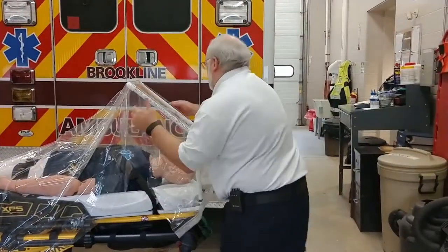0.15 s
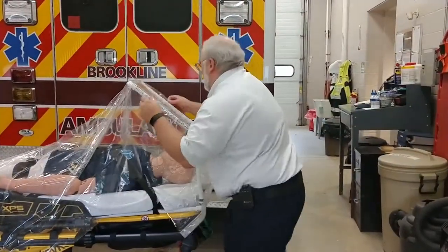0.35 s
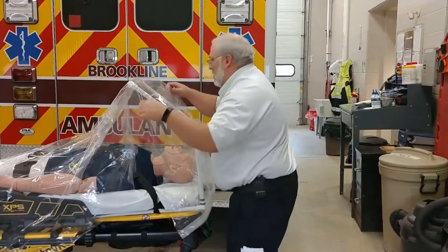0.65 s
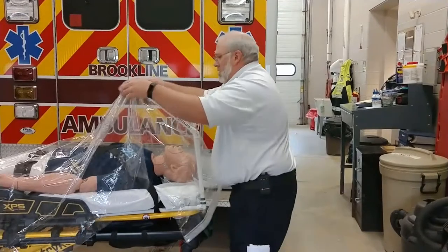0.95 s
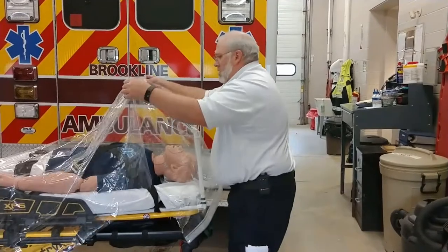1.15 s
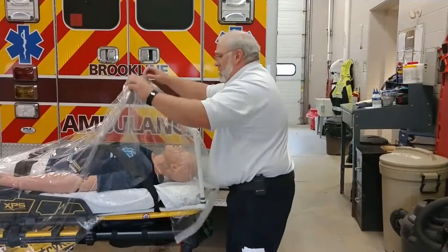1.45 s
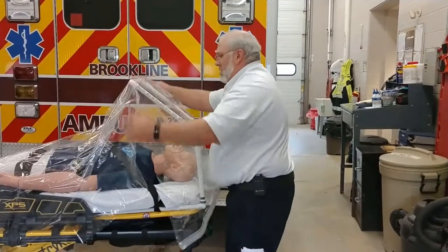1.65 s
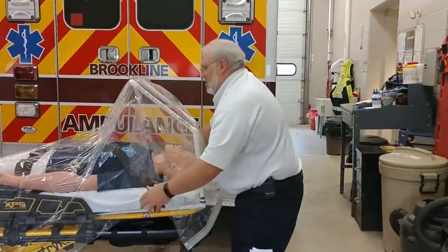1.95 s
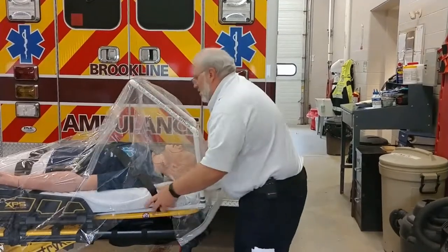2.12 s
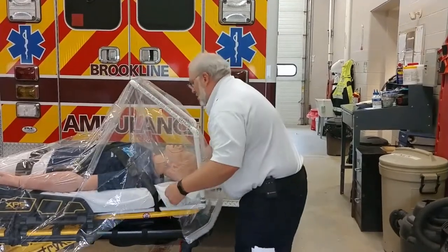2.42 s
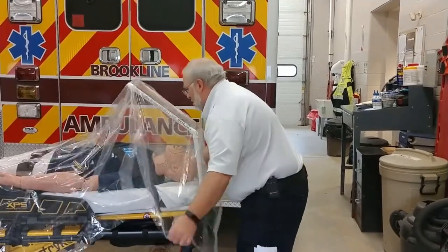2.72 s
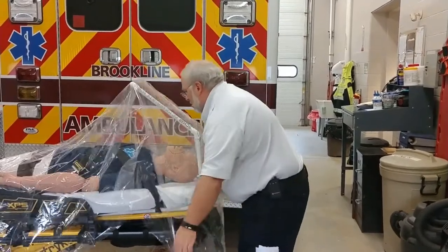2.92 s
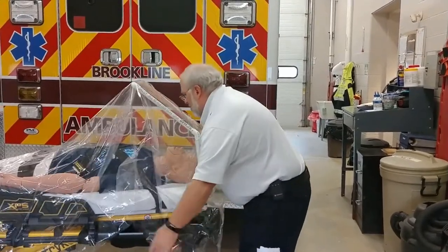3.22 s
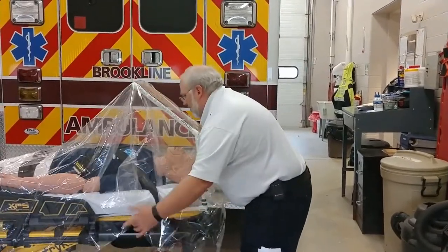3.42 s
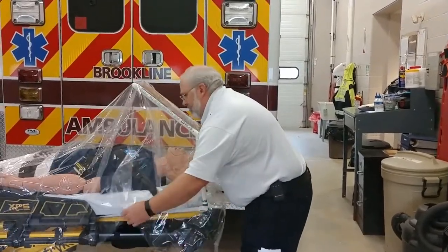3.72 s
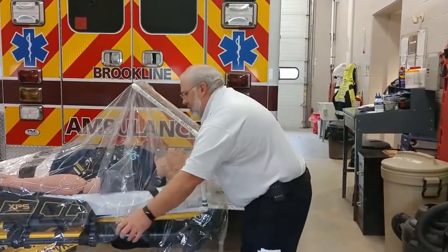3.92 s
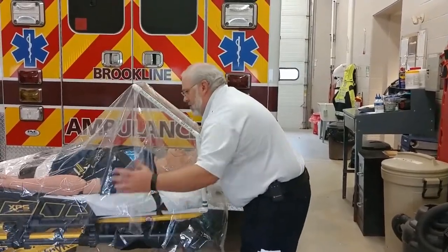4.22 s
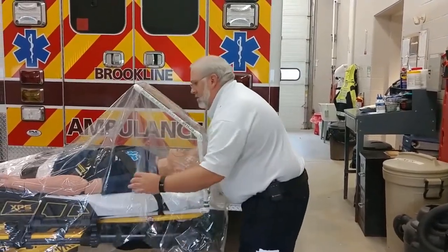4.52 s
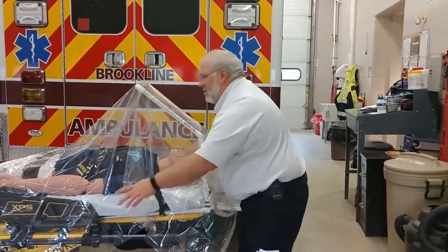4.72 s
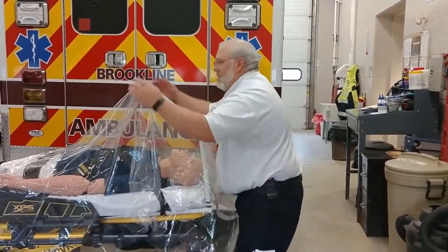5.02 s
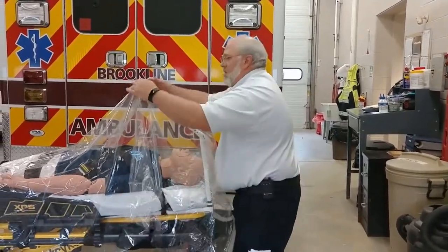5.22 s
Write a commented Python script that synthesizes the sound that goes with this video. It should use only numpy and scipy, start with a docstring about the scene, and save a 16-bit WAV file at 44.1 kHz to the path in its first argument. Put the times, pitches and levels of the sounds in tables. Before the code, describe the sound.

Plastic film crinkles in irregular bursts, bright fine creases over duller folds. A strong early snap leads to a rustling pull, then weaker movements; the loudest jerk comes about halfway, with booming panels and a slap. Later handling brings many quick cracks, then near quiet and a last faint crinkle. Heard from a few metres in a reverberant garage, through a camera microphone with reduced room noise and a faint hum.

```python
"""A bright, dry plastic crackle comes in uneven pulls, with sharp single cracks and dull thuds among it.
A stiff clear sheet is pulled over a frame in a large hard-walled garage, a few metres from a camera.
Rustle, panels and billows are crowds of random noise bursts; cracks are single bursts, the slap a short swing.
Decaying noise makes the walls' answer, and a faint hum stays in the room.
One microphone rings in its housing, and the camera turns down the room noise."""
import sys
import numpy as np
from scipy import signal
from scipy.fft import rfft, irfft, next_fast_len
from scipy.io import wavfile
from scipy.ndimage import uniform_filter1d

SR = 44100
rng = np.random.default_rng(int(sys.argv[2]) if len(sys.argv) > 2 else 0)


def transcribe(signal):
    """Save signal, clipped to [-1, 1], as a 16-bit WAV file at the path in sys.argv[1]."""
    frames = np.atleast_2d(signal).T
    limited = np.clip(frames, -1, 1)
    pcm = np.round(limited * 32767).astype(np.int16)
    wavfile.write(sys.argv[1], SR, pcm)


N = 236014  # length in samples

# uneven pulls of the sheet, each swelling and fading in its own way:
# t/s, level of wide folds/dB, level of fine creases/dB
PULLS = [
    [(0, -53.5, -52), (.13, -56.5, -54), (.42, -57.5, -52.5), (.448, -58, -43), (.496, -55, -60)],
    [(.499, -46.5, -39.5), (.535, -42.5, -41), (.555, -44.5, -43.5), (.869, -49.5, -46),
     (1.027, -62, -72.5), (1.055, -59.5, -69), (1.096, -62, -56)],
    [(1.099, -56, -49.5), (1.123, -55.5, -48.5), (1.245, -55.5, -47), (1.265, -59, -54),
     (1.354, -54.5, -46.5)],
    [(1.357, -52, -43.5), (1.377, -50.5, -41.5), (1.627, -49.5, -46), (1.783, -58, -59.5),
     (1.835, -63, -71), (1.85, -59, -55.5), (1.875, -61.5, -63)],
    [(1.878, -55.5, -46), (1.934, -65, -71), (1.95, -60.5, -54.5), (2.002, -66.5, -59.5)],
    [(2.005, -58, -47.5), (2.079, -47, -40), (2.225, -53, -47.5), (2.429, -60.5, -60.5),
     (2.473, -67, -62.5), (2.548, -59.5, -61)],
    [(2.551, -53, -50.5), (2.597, -55.5, -52), (2.735, -43, -35), (2.745, -35.5, -31), (2.791, -44.5, -36),
     (2.829, -40, -34), (3.073, -49, -44.5)],
    [(3.097, -44.5, -40), (3.141, -45.5, -39.5), (3.173, -53.5, -46.5), (3.366, -55, -62)],
    [(3.369, -56, -60), (3.397, -54.5, -50), (3.447, -58.5, -50), (3.487, -55, -49.5), (3.855, -51, -45)],
    [(3.867, -48, -38), (3.921, -49.5, -43), (3.971, -45.5, -38.5), (4.093, -55, -51.5), (4.101, -52, -47),
     (4.241, -57.5, -62), (4.283, -62, -71), (4.339, -57.5, -59)],
    [(4.342, -59.5, -52), (4.406, -55, -52.5), (4.502, -50.5, -46.5), (4.584, -54.5, -45.5),
     (4.726, -54, -44), (4.79, -57.5, -47), (4.902, -56, -56), (5.01, -70, -87), (5.262, -76.5, -99)],
    [(5.265, -79, -62), (5.281, -80, -54), (5.337, -67, -61), (5.35, -76, -74)],
]
# tone of the wide folds: f/Hz, relative level/dB
WIDE_TONE = [(900, -31), (1500, -5.5), (2100, -2), (2500, -1.5), (2900, -1), (3300, -0.5), (3700, -3.5),
             (4800, -35.5)]
# tone of the tight folds: f/Hz, relative level/dB
TIGHT_TONE = [(2800, -35.5), (3700, -2), (4400, -2.5), (5400, -1), (6200, -2), (8000, -39)]
# tone of the fine creases, also of a crack's edge: f/Hz, relative level/dB
FINE_TONE = [(4800, -42), (6300, -3), (8000, 1), (10500, 0.5), (11500, -3), (13000, -6), (15300, -12),
             (17000, -8)]


def rustle():
    """Small creases snap brightly and briefly; wide folds are duller and longer."""
    wide_db, fine_db = levels(np.concatenate(PULLS))
    # tight folds lie between the other two, 58 % of the way to the fine ones, then 2.5 dB lower
    tight_db = wide_db + 0.58 * (fine_db - wide_db) - 2.5
    wide = creases(WIDE_TONE, per_s=870, spread_db=2.5, life=0.0033, smooth=1.0, patchy_db=1.77)
    tight = creases(TIGHT_TONE, per_s=610, spread_db=3.5, life=0.0034, smooth=1.0, patchy_db=1.0)
    fine = creases(FINE_TONE, per_s=1200, spread_db=2.5, life=0.00083, smooth=1.0, patchy_db=1.74)
    return amp(wide_db) * wide + amp(tight_db) * tight + amp(fine_db) * fine


# single cracks: t/s, level of bright edge/dB, level of dull body/dB, centre f of the edge/Hz
BIG_CRACKS = [(.0326, -37, -48, 10600), (.1437, -39, -35.5, 7900), (.1704, -30, -33.5, 9400),
              (.3619, -35, -39, 9400), (.4264, -34, -53.5, 10900), (.444, -34, -32.5, 11000),
              (.4596, -27, -33, 10900), (.5287, -16, -28.5, 7240), (.5355, -36, -21.5, 8140),
              (.8203, -30, -29, 9800), (1.1001, -44, -39, 9500), (1.3048, -35, -38, 10900),
              (1.38, -26, -28, 11000), (1.4892, -34, -28, 10500), (1.8802, -36.5, -38, 9500),
              (2.0049, -34, -28.5, 9500), (2.5518, -42, -33.5, 9300), (2.6562, -26, -29, 9400),
              (2.716, -54, -23.5, 8850), (2.7473, -28, -13.5, 10400), (2.826, -21, -30, 10660),
              (2.9929, -24.5, -28.5, 10700), (3.3013, -35, -42, 10300), (3.3702, -36, -47, 9400),
              (3.478, -34.5, -33.5, 9100), (3.5611, -27, -44.5, 10300), (3.6019, -30, -34, 10200),
              (3.7572, -29, -43, 10800), (3.817, -32, -33, 10400), (3.8703, -22.5, -25.5, 10300),
              (3.9634, -39, -31, 9000), (4.1032, -26.5, -33.5, 9700), (4.3428, -33.5, -32.5, 9200),
              (4.3702, -36, -33.5, 10600), (4.4387, -35, -40, 10300), (4.4904, -24, -32, 10000),
              (4.4967, -28, -34, 9600), (4.513, -35, -30.5, 10100), (4.541, -32.5, -40, 10600),
              (4.591, -22, -28, 10800), (4.605, -31, -37, 9900), (4.631, -24, -34, 10600),
              (4.6522, -28, -25.5, 10000), (4.6581, -35, -33, 10000), (4.6817, -41, -33, 9300),
              (4.6904, -17, -33, 10800), (4.7442, -28.5, -37, 10400), (4.7498, -24.5, -26.5, 9550),
              (4.7612, -22.5, -33.5, 10500), (5.021, -50, -39.5, 7600), (5.2656, -29, -41, 11500),
              (5.2828, -40.5, -41.5, 10200), (5.3016, -47, -49.5, 9400), (5.3145, -49, -44, 9300)]
# tone of a crack's dull body: f/Hz, relative level/dB
BODY_TONE = [(300, -68.5), (600, -22.5), (1000, -4), (2000, -6.5), (3500, -1), (5500, 2), (8000, -13.5)]


def cracks():
    """Each big buckle is a sharp bright edge over a dull body; the tighter the crease, the higher its edge."""
    s, edge_db, body_db, edge_hz = np.concatenate([BIG_CRACKS, lesser_cracks()]).T

    def edge_colour(hz):
        log_distance = np.log((hz + 1) / edge_hz[:, None, None])
        return amp(-9 * (log_distance / 0.31) ** 2 + along(FINE_TONE, hz))

    def body_colour(hz):
        return amp(along(BODY_TONE, hz))

    edges = crack_bursts(edge_db, edge_colour, life=0.00047, shiver_db=-17.5, shiver=0.013)
    bodies = crack_bursts(body_db, body_colour, life=0.00068, shiver_db=-13, shiver=0.015)
    out = np.zeros((2, N + SR))
    for start, burst in zip(np.round(s * SR).astype(int), edges + bodies):
        out[:, start:start + burst.shape[1]] += burst
    return out[:, 64:N + 64]  # skip the lead-in of the bursts


def lesser_cracks():
    """Random rows like those of the big cracks, as strong as the rustle around them allows."""
    per_s = 6
    when, size, tightness = rng.random((int(per_s * N / SR), 3)).T
    at = (when * N).astype(int)
    wide_db, fine_db = levels(np.concatenate(PULLS))
    extra_db = -3 * np.log(np.maximum(size, .05))  # a few are much stronger
    edge_db = fine_db[at] + 9.5 + extra_db
    body_db = wide_db[at] + 11 + extra_db
    edge_hz = 9800 * (0.73 + 0.37 * tightness)
    return np.transpose([at / SR, edge_db, body_db, edge_hz])


def crack_bursts(db, colour, life, shiver_db, shiver):
    """One short coloured burst per crack, set to its peak; the film shivers briefly after it (times in s)."""
    t = np.arange(-64, 2048) / SR  # 64 samples of lead-in
    age = np.maximum(t, 0)
    rise = 1 - np.exp(-age / 0.00025)
    shape = rise * (np.exp(-age / life) + amp(shiver_db) * np.exp(-age / shiver))
    noise = shape * rng.standard_normal((len(db), 2, len(t)))
    burst = irfft(rfft(noise) * colour(np.fft.rfftfreq(len(t), 1 / SR)))
    return amp(db)[:, None, None] * burst / abs(burst).max(axis=2, keepdims=True)


SLAP_S = 2.8444  # moment of the slap, s
# a panel slaps the frame: level before rise and filter/dB, f/Hz, decay time/s
SLAP_SWING = (-16, 1420, 0.00078)


def slap():
    """One taut panel hits the frame: little more than a single swing."""
    db, hz, life = SLAP_SWING
    age = np.maximum(np.arange(N) / SR - SLAP_S, 0)
    rise = 1 - np.exp(-age / 0.00015)
    swing = np.exp(-age / life) * rise * np.sin(2 * np.pi * hz * age)
    return -amp(db) * filtered(swing, lambda f: f ** 2 / (f ** 2 + 400 ** 2))  # less bass below 400 Hz


# tone of the booming panels: f/Hz, relative level/dB
PANEL_TONE = [(200, -95), (450, -14.5), (640, -4.5), (760, 2.5), (1000, 4), (1500, -4), (2200, -39.5),
              (5000, -94)]


def panels(billow):
    """Whole panels boom with the folds, flex with each billow and shudder after the slap."""
    wide_db, _ = levels(np.concatenate(PULLS))
    swing = amp(-56 + 1.026 * (wide_db + 50.5))  # panels swing a little wider than the folds
    flex = amp(-2.5) * billow
    since_slap = np.arange(N) / SR - SLAP_S
    shudder = amp(-31.5) * (since_slap > 0) * np.exp(-abs(since_slap) / 0.0096)
    boom = creases(PANEL_TONE, per_s=140, spread_db=3.0, life=0.0043, smooth=1.0, patchy_db=2.0)
    return (np.hypot(swing, flex) + shudder) * boom


# the whole sheet billows: start t/s, length/s, level before rise and sag/dB
BILLOWS = [(.02, 0.068, -65), (.14, 0.088, -63), (.24, 0.16, -65.5), (.44, .05, -62), (.51, 0.029, -54.5),
           (.57, 0.31, -51), (1.1, 0.14, -68.5), (1.35, .37, -57), (2.03, 0.16, -56.5), (2.53, 0.205, -64),
           (2.71, 0.09, -43), (2.83, 0.21, -50.5), (3.07, .22, -58), (3.38, .1, -63.5), (3.51, 0.11, -72),
           (3.62, 0.073, -60), (3.73, 0.11, -66), (3.86, 0.23, -56.5), (4.405, .04, -63),
           (4.47, 0.046, -64), (4.53, 0.092, -63.5), (4.67, 0.046, -68.5), (4.735, 0.035, -66.5),
           (4.79, 0.033, -75)]
# course of a billow: attack/s, sag/(dB per s), release/(dB per s)
BILLOW_SHAPE = (0.025, 35.2, 210)
# tone of the billows: f/Hz, relative level/dB
BILLOW_TONE = [(40, -90), (100, -29), (160, -8), (260, 1.5), (460, 1), (550, -5), (700, -9), (1500, -88)]


def billowing(billow):
    """The sheet as a whole moves the air in dull, long bursts over a faint floor."""
    dull = creases(BILLOW_TONE, per_s=36, spread_db=1.0, life=0.042, smooth=0.44, patchy_db=0.0)
    return (billow + amp(-89.5)) * dull


# soft low bumps: start t/s, length/s, level before rise and sag/dB
BUMPS = [(.57, .08, -77), (.76, .08, -78), (1.6, 0.076, -87), (2.08, .06, -93), (2.32, 0.07, -74),
         (2.53, .07, -77), (2.73, 0.27, -65), (3.1, 0.061, -71), (3.61, 0.082, -79), (3.95, 0.082, -88),
         (5.01, 0.077, -73), (5.2, 0.089, -74)]
# course of a bump: attack/s, sag/(dB per s), release/(dB per s)
BUMP_SHAPE = (0.0372, 29, 310)
# tone of the bumps: f/Hz, relative level/dB
BUMP_TONE = [(20, -68), (45, -22), (80, 15), (150, 13.5), (220, -27.5), (400, -86)]


def bumps():
    """Soft swells of low, slowly dying noise over a faint floor."""
    rumble = creases(BUMP_TONE, per_s=9.3, spread_db=0.5, life=0.039, smooth=1.0, patchy_db=0.5)
    return (swells(BUMPS, BUMP_SHAPE) + amp(-88)) * rumble


# time for the walls' answer to fall by 60 dB: f/Hz, t60/s
GARAGE_DECAY = [(300, 0.85), (1200, 0.9), (3000, 0.87), (5000, 0.939), (9000, 0.63), (15000, 0.33)]


def garage(x):
    """Each frequency of the walls' answer dies at its own speed; long waves reach both microphones alike."""
    hz, t, (a, b) = signal.stft(rng.standard_normal((2, SR)), SR, nperseg=256)
    alike = np.clip(along(LIKENESS, hz), 0, 1)[:, None]
    z = np.array([a, alike * a + np.sqrt(1 - alike ** 2) * b])
    decay = amp(-60 * t / along(GARAGE_DECAY, hz)[:, None])
    tail = signal.istft(z * decay, SR, nperseg=256)[1]
    delayed = np.pad(x, ((0, 0), (300, 0)))  # the walls answer 300 samples late
    return signal.fftconvolve(delayed, tail / np.linalg.norm(tail[0]), axes=1)[:, :N]


def hum():
    """A faint steady sine tone in the room."""
    return amp(-88) * np.sin(2 * np.pi * 607 * np.arange(N) / SR)


def creases(spectrum, per_s, spread_db, life, smooth, patchy_db):
    """Random buckles: many faint, few strong, each a short burst, over a smooth share of sliding film."""
    when, size = rng.random((2, N))
    kicks = (when < per_s / SR) * amp(-spread_db * np.log(np.maximum(size, .05)))
    envelope = np.sqrt(unit(dying(kicks, life)) ** 2 + smooth ** 2)
    return unit(filtered(envelope * pair(patchy_db), lambda hz: amp(along(spectrum, hz))))


def dying(kicks, life):
    """Envelope of kicks whose energy dies with time constant life (s)."""
    return np.sqrt(signal.lfilter([1], [1, -np.exp(-1 / (life * SR))], kicks ** 2))


# how alike left and right are: f/Hz, likeness from 0 to 1
LIKENESS = [(60, 0.7), (150, 0.95), (380, 0.95), (950, 0.72), (2380, 0.01), (5980, 0.02), (15000, 0.05)]


def pair(patchy_db):
    """White noise for both microphones, alike in the bass, with drifting patches of gain."""
    z = signal.stft(rng.standard_normal((2, N)), nperseg=256)[2]
    field = uniform_filter1d(rng.standard_normal(z.shape[1:]), size=5, axis=0)
    field = uniform_filter1d(field, size=8, axis=1)
    noise = signal.istft(z * amp(patchy_db * unit(field)), nperseg=256)[1][:, :N]

    def mid_side_gains(hz):
        turn = np.arccos(np.clip(along(LIKENESS, hz), -1, 1)) / 2
        return np.array([np.cos(turn), np.sin(turn)])

    mid, side = filtered(noise, mid_side_gains)
    return unit(np.array([mid + side, mid - side]))


def swells(rows, shape):
    """Gain of swells that rise, sag slowly for their length and then drop away."""
    attack, sag_db, release_db = shape
    s, length, db = np.transpose(rows)[..., None]
    t = np.linspace(0, N / SR, num=N // 64)  # a coarse time grid is enough
    age = np.maximum(t - s, 0)
    fall_db = sag_db * age + release_db * np.maximum(age - length, 0)
    rise = np.minimum(age / attack, 1) ** 2
    gain = np.linalg.norm(rise * amp(db - fall_db), axis=0)  # overlapping swells add their power
    return np.interp(np.arange(N) / SR, t, gain)


def levels(rows):
    """One dB value per sample for each column after the time."""
    s, *cols = np.transpose(rows)
    return [np.interp(np.arange(N) / SR, s, db) for db in cols]


def amp(db):
    """Gain of a level in dB."""
    return 10 ** (np.asarray(db) / 20)


def unit(x):
    """x at rms 1."""
    return x / np.sqrt(np.mean(x ** 2) + 1e-20)


def along(points, hz):
    """Value at hz between (Hz, value) points, read on a log axis."""
    f, v = np.transpose(points)
    return np.interp(np.log(hz + 1), np.log(f + 1), v)


def filtered(x, response):
    """x times a response of frequency."""
    m = next_fast_len(N + 8192)
    return irfft(rfft(x, m) * response(np.fft.rfftfreq(m, 1 / SR)), m)[..., :N]


def scene():
    """The sheet, direct and off the walls; the housing shades the left microphone from the direct cracks."""
    billow = swells(BILLOWS, BILLOW_SHAPE)
    sheet = rustle() + panels(billow) + billowing(billow) + bumps() + slap()
    snaps = cracks()
    direct = sheet + snaps * amp([[-5], [0]])
    walls = garage(amp(-7.0) * sheet + amp(-7.5) * snaps)
    return direct + walls + hum()


# room noise that the camera expects: f/Hz, level/dB
BACKGROUND = [(60, -100), (200, -80), (550, -85), (900, -82), (1500, -89), (3000, -110), (15000, -113)]


def suppressor(x, depth_db):
    """Bands that sink near the expected background are turned down, both channels together."""
    hz, _, z = signal.stft(x, SR, nperseg=1024, noverlap=768)
    power = uniform_filter1d(np.mean(abs(z) ** 2, 0), size=3, axis=0)
    power = uniform_filter1d(power, size=3, axis=1)
    expected = amp(2 * along(BACKGROUND, hz))[:, None]  # twice the dB gives power
    keep = 1 - expected / (abs(power) + 1e-20)
    return signal.istft(z * np.maximum(keep, amp(depth_db)), SR, nperseg=1024, noverlap=768)[1][:, :N]


# the right microphone sits in a cavity of the housing: f/Hz, level over the left one/dB
CAVITY = [(60, 7.5), (150, 0), (400, 1), (1000, 0), (2000, 7), (2850, 11.5), (3700, 5.5), (4200, 6),
          (5000, 7), (5900, 1.5), (7300, 6), (8500, 0.5), (11800, 7.5), (15000, 4.5)]


def record(dry):
    """Housing colour, noise suppression, and nothing above the band limit."""
    right_only = np.array([[0], [1]])
    heard = filtered(dry, lambda hz: amp(right_only * along(CAVITY, hz) - 2.5))
    return filtered(suppressor(heard, depth_db=-9.5), lambda hz: hz < 15900)


dry = scene()
out = record(dry)
transcribe(out)
```